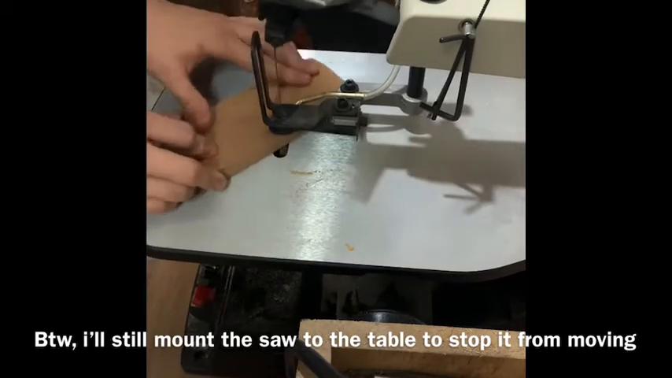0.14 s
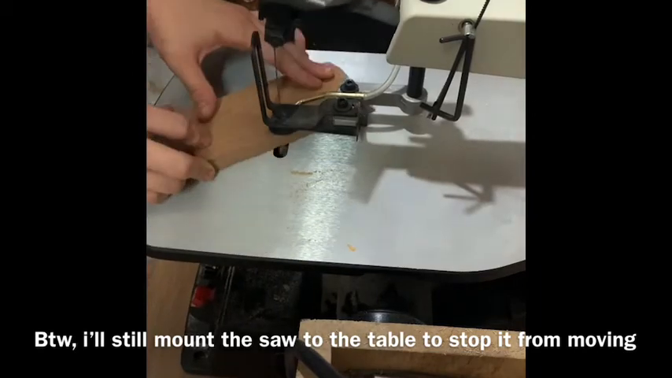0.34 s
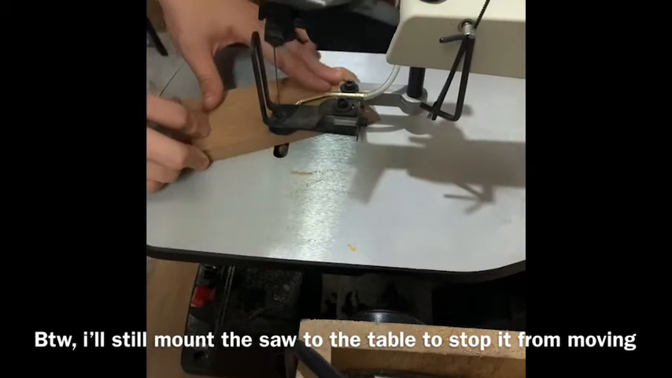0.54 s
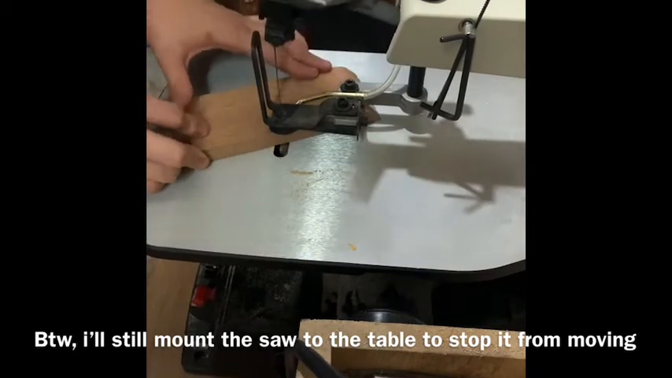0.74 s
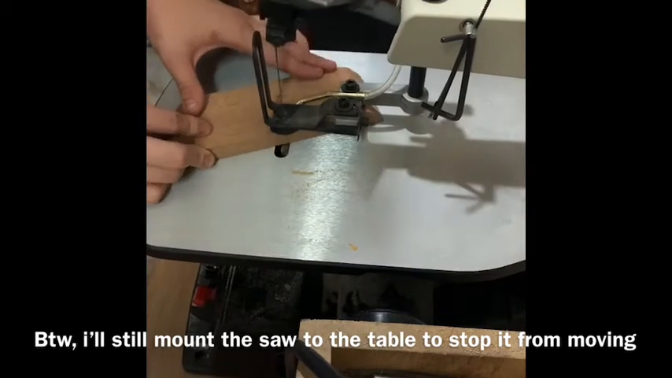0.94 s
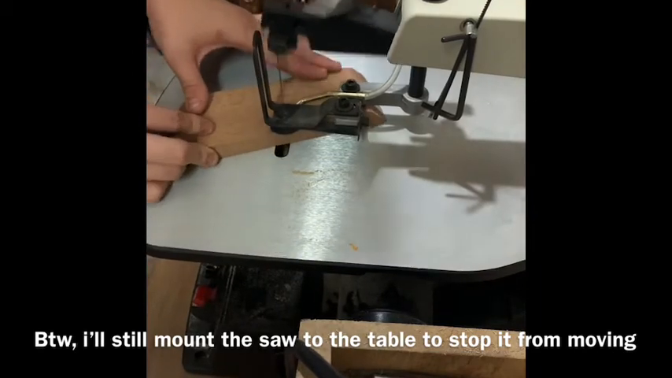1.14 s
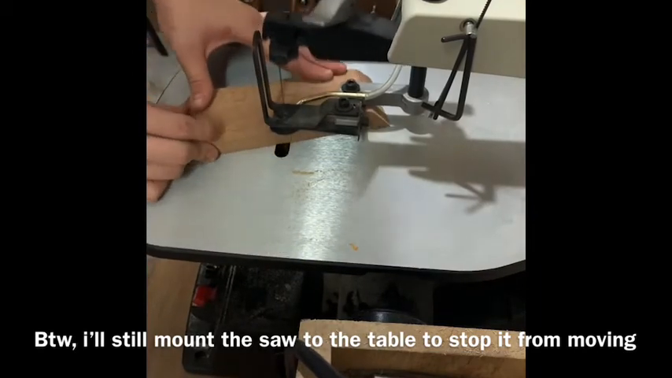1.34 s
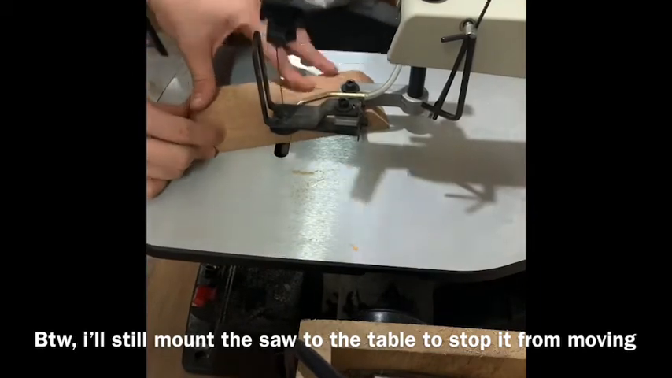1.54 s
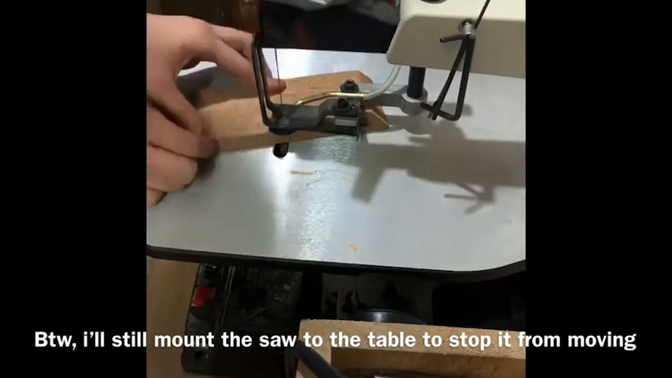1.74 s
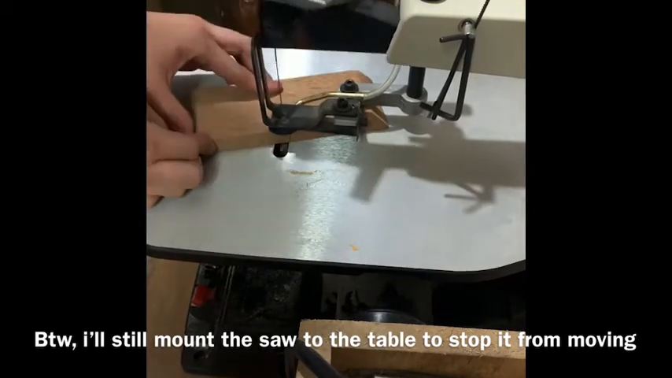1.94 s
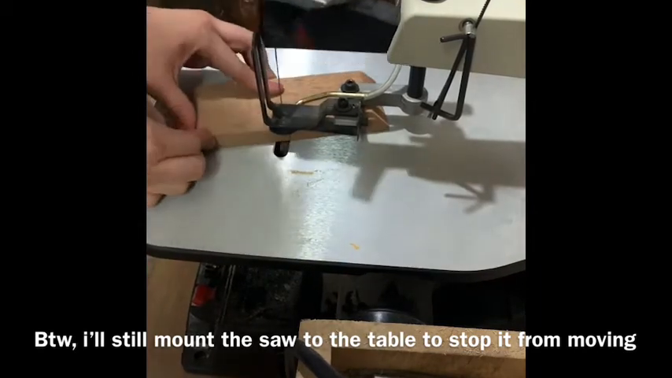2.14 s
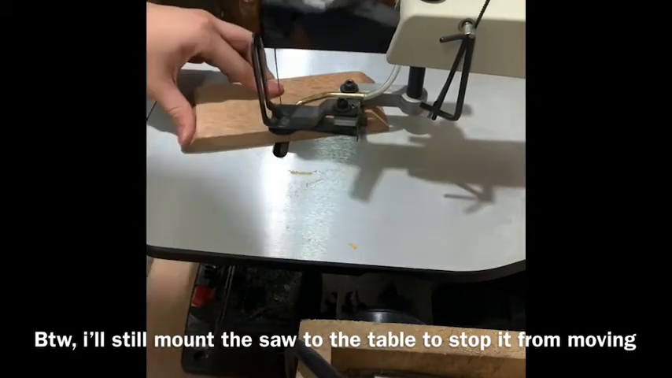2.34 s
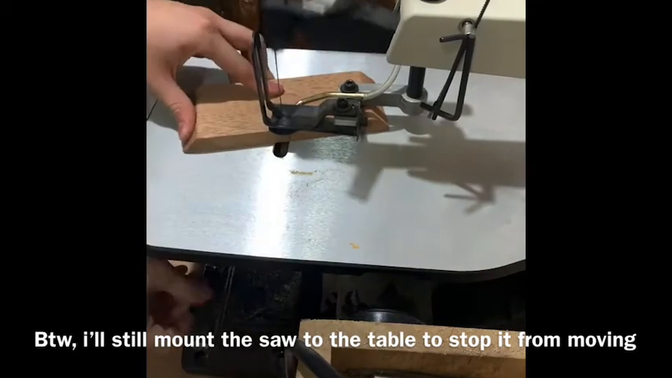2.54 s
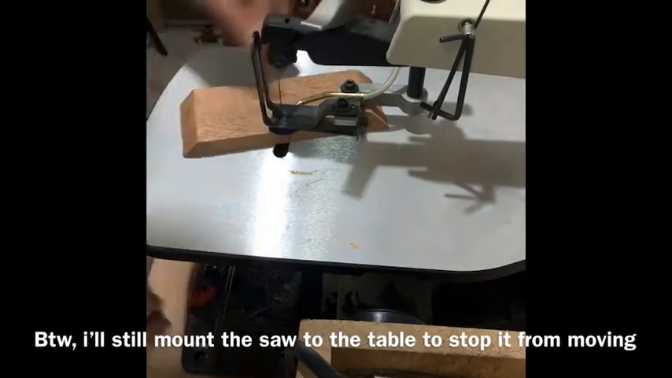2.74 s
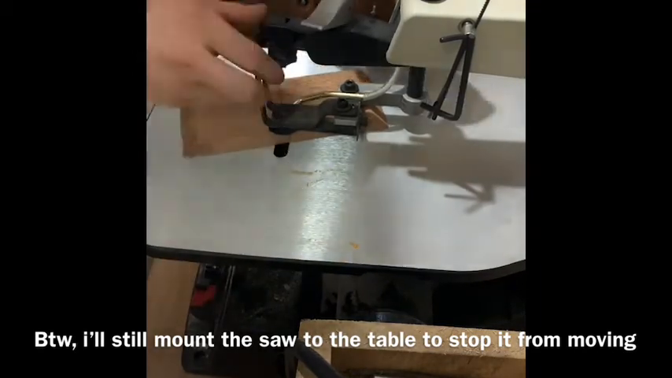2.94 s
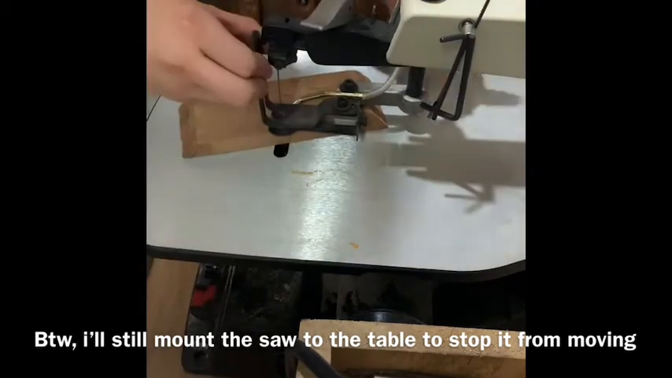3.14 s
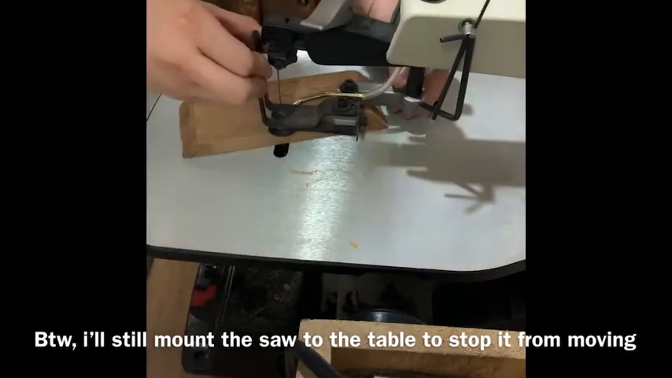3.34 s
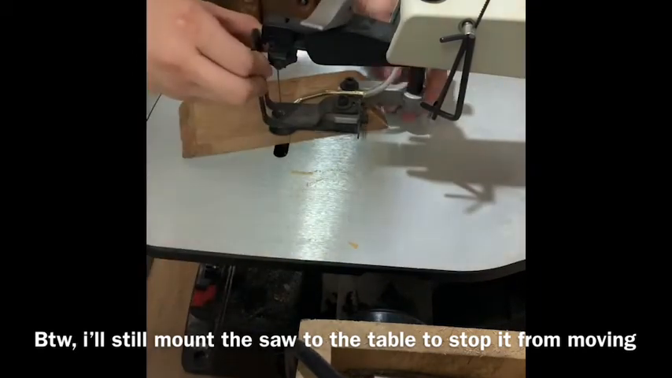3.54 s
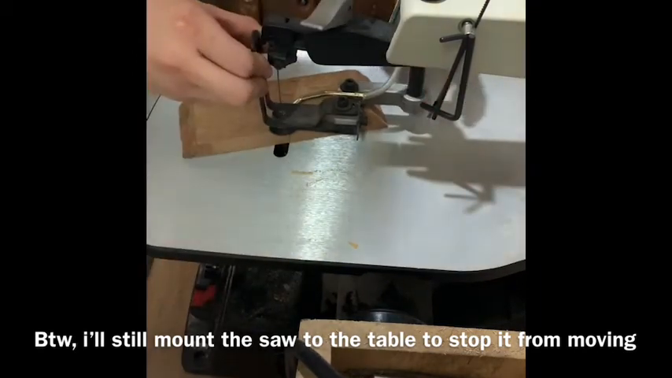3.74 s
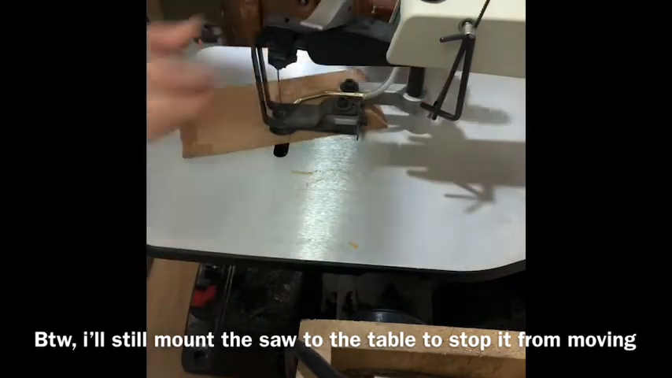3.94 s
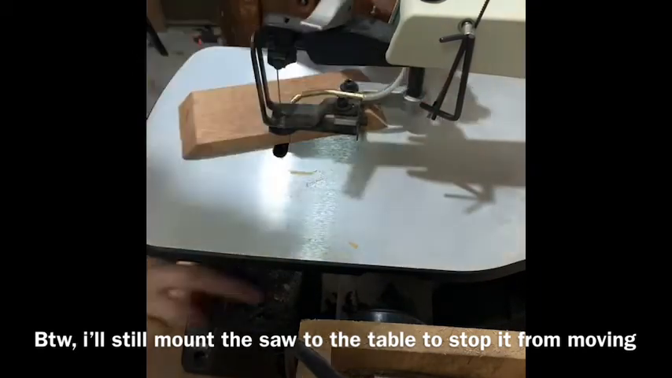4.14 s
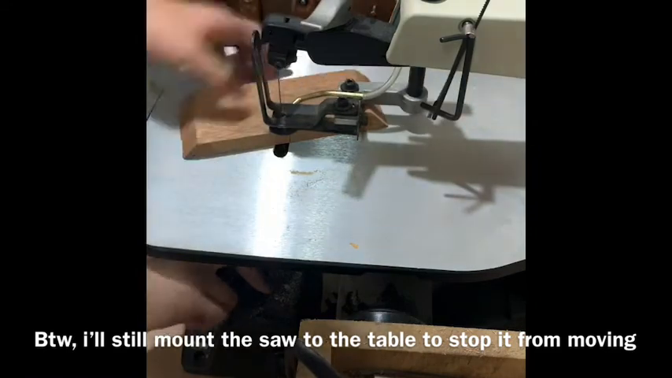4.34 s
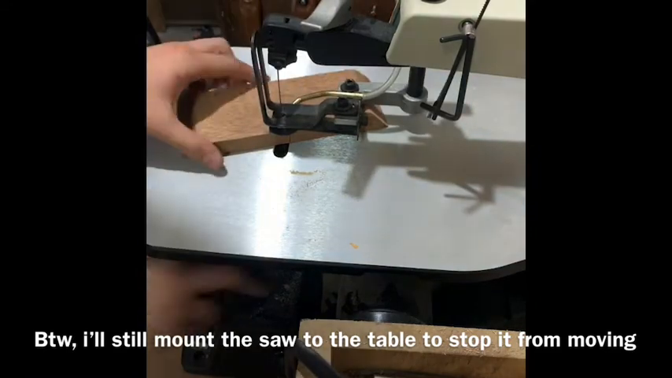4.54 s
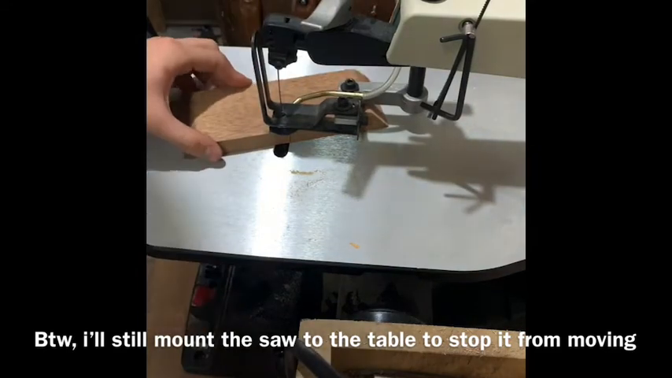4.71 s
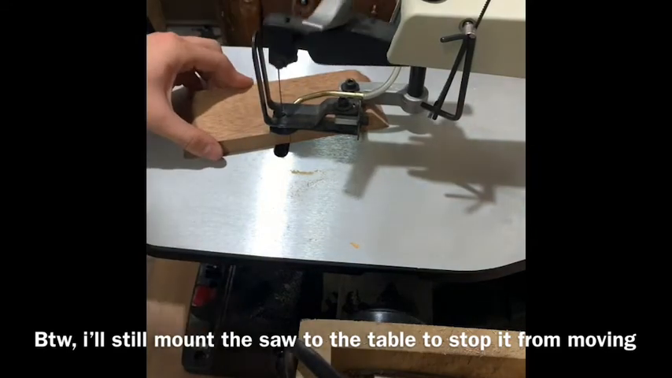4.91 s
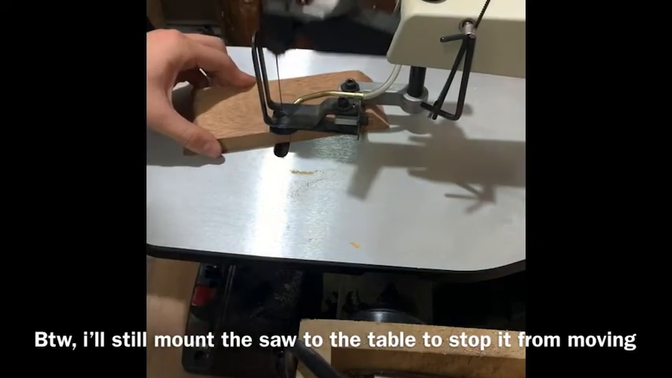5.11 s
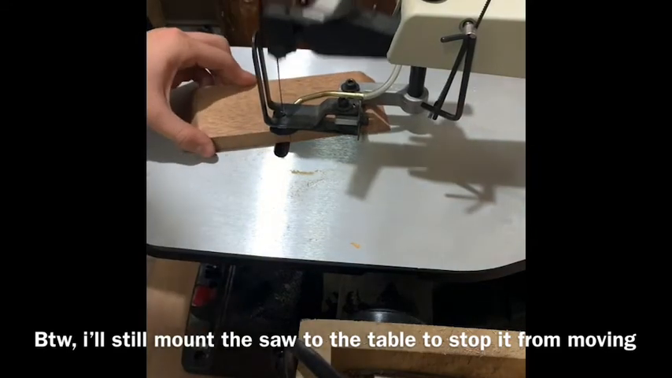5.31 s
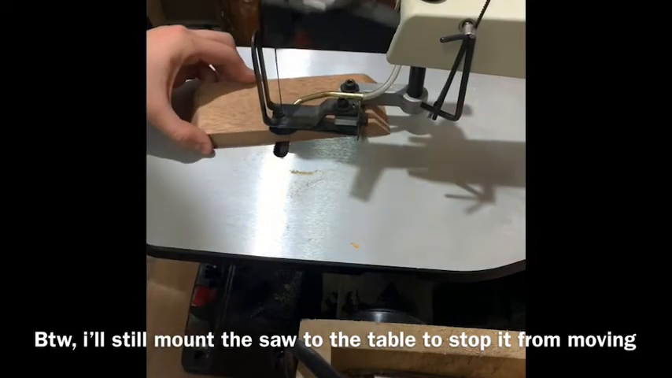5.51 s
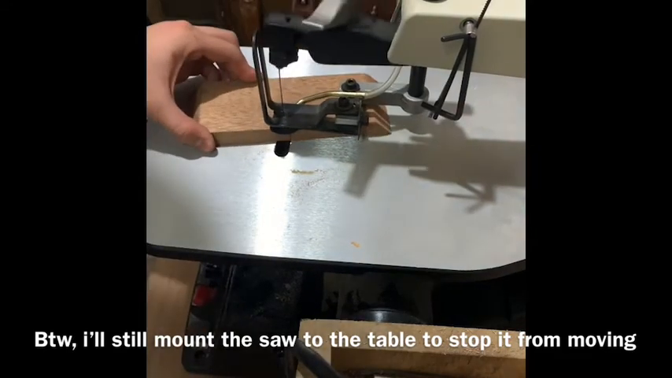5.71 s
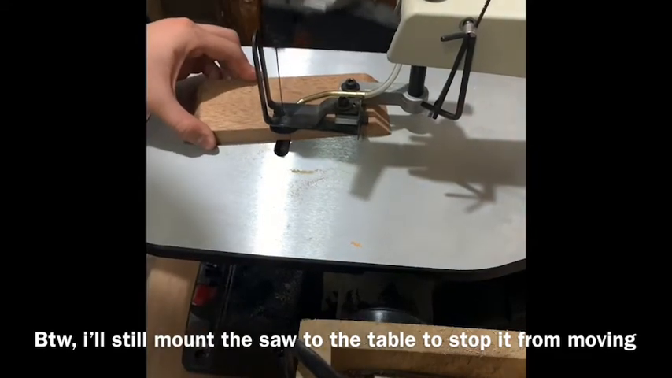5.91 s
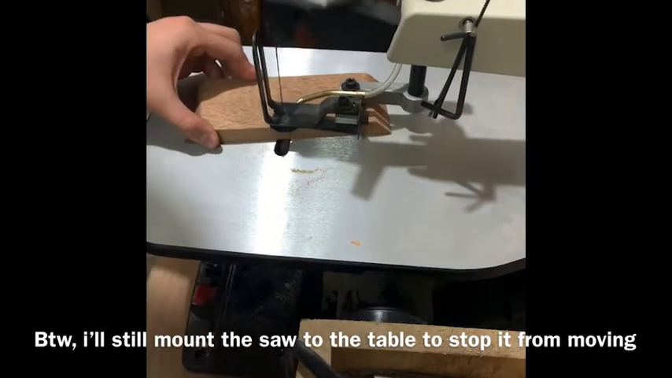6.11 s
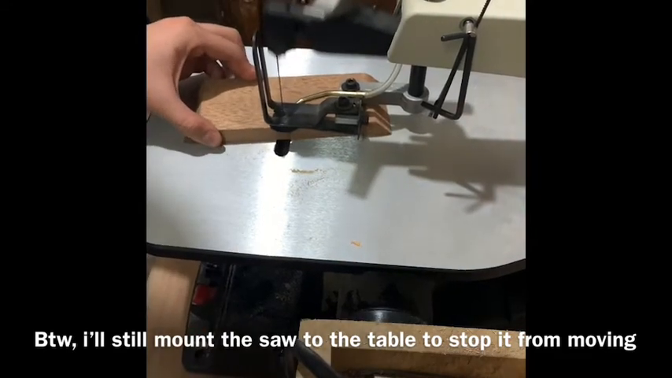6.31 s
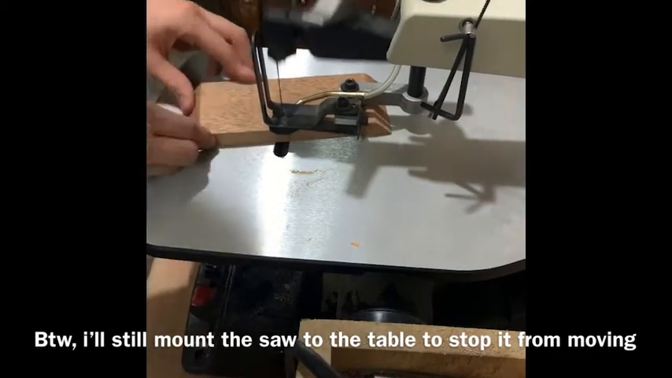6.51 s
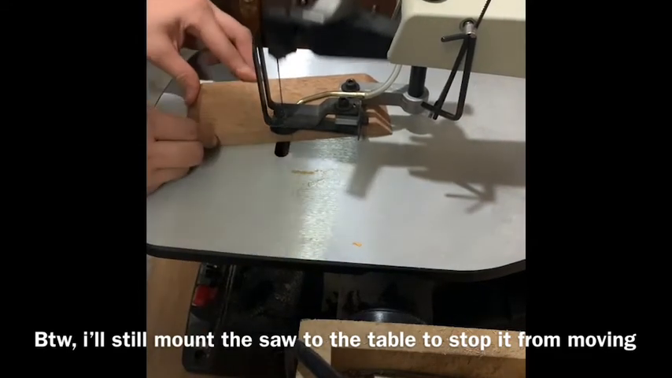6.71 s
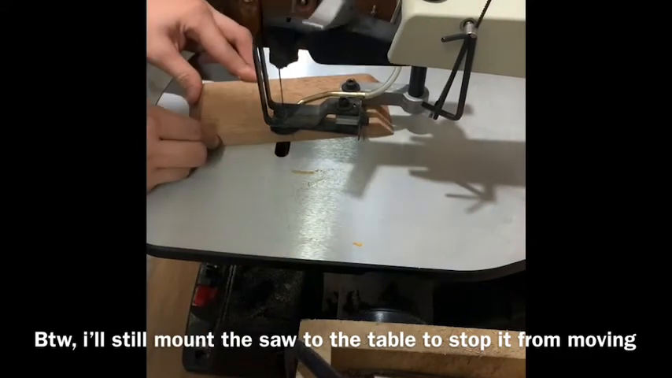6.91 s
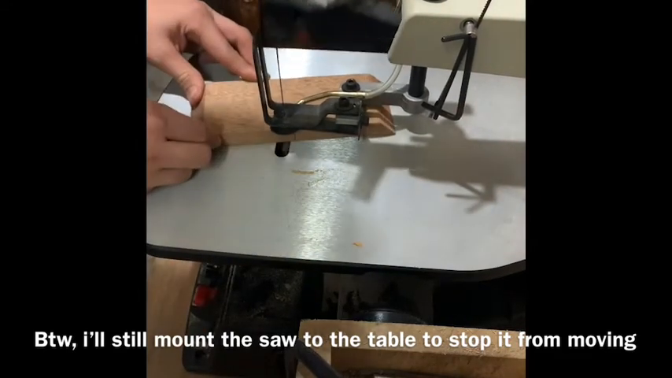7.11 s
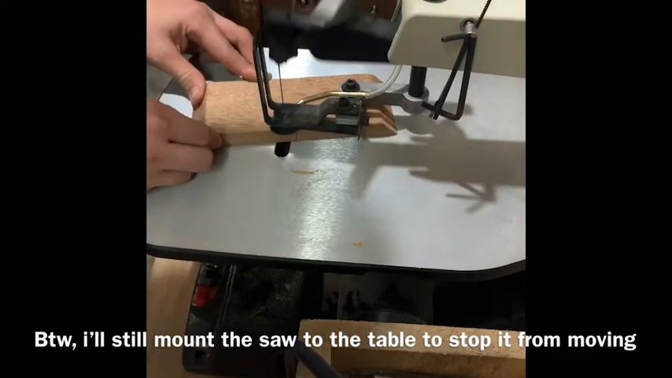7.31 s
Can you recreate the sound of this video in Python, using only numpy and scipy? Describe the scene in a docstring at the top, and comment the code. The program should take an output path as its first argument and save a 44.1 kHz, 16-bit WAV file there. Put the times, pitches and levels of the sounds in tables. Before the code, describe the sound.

A small scroll saw buzzes and rasps through wood, clacks off to a quiet pause, then clacks on and cuts again with brief scraping shrieks.

```python
"""A scroll saw is already cutting a board in a small workshop; it is switched off, and starts again.
Its motor buzzes on rectified mains, swung by the crank about 14 times a second. On every stroke the teeth
rasp through the wood, rattle the board and make the table boom; a heavier feed and a slower crank bring
more rattle, and twisting the board favours the blade's high tone. For a few strokes the blade binds and
shrieks. Two close microphone ports hear it all, with short echoes around."""
import sys
import numpy as np
from scipy import signal
from scipy.fft import rfft, irfft, next_fast_len
from scipy.io import wavfile
from scipy.ndimage import uniform_filter1d

SR = 44100
rng = np.random.default_rng(int(sys.argv[2]) if len(sys.argv) > 2 else 0)


def wrap_up_sound(samples):
    """Save the sound to the file named by the first command line argument, as 16-bit audio."""
    columns = np.atleast_2d(samples).T
    # keep every value between -1 and 1, then stretch to whole-number steps
    tamed = np.clip(columns, -1, 1)
    steps = np.round(tamed * 32767).astype(np.int16)
    wavfile.write(sys.argv[1], SR, steps)


N = 324576

# Resonances of the saw's arm. Each row: pitch in Hz, width in Hz, relative level in dB.
ARM_MODES = [(3175, 120, 1.5), (3455, 140, -2.5), (3610, 82, -0.5), (4200, 53, -9), (4507, 80, 8.5),
             (5034, 76, 4), (5380, 96, -3.5), (5760, 31, 3), (6280, 120, -4.5), (7100, 19, -3),
             (8350, 130, 4)]
# Thin ringing of the steel blade. Each row: pitch in Hz, width in Hz, relative level in dB.
STEEL_MODES = [(4550, 180, 11), (8400, 120, 7), (11300, 92, -5), (12500, 100, 2), (13500, 120, 3),
               (14560, 130, 8.5), (15000, 130, -3)]
# Hiss of the dust, also used for light ticks and faint room hiss. Each row: Hz, relative level in dB.
DUST_SPECTRUM = [(4000, -9.5), (8000, 4), (9600, 1), (11500, 0.5), (13000, -4), (14800, -5), (16000, -11)]
# Bright scrape of the binding blade and snap of the switch. Each row: Hz, relative level in dB.
SHRIEK_SPECTRUM = [(700, -15), (2000, -3), (3200, 0.5), (4400, -0.5), (6000, -3), (8500, 1.5), (9600, 5),
                   (12500, -1), (14700, 3), (16000, -17)]
POWER_OFF_S, POWER_ON_S = 2.605, 4.733
RIPPLE_HZ = 120.05  # ripple of the rectified mains


def from_db(db):
    """Level in dB to an amplitude factor."""
    return 10 ** (np.asarray(db) / 20)


def rms_one(x):
    """Scale to an rms of 1."""
    return x / np.sqrt(np.mean(x ** 2) + 1e-20)


def seconds():
    """Time of every sample."""
    return np.arange(N) / SR


def in_time(rows):
    """The columns of a curve, read at every sample."""
    s, *columns = np.transpose(rows)
    return [np.interp(seconds(), s, c) for c in columns]


def at_hz(points, hz):
    """A curve over frequency, read along a logarithmic axis."""
    known_hz, values = np.transpose(points)
    return np.interp(np.log(hz + 1), np.log(known_hz), values)


def drift(rate):
    """Slow chance with spread 1: noise through two equal low-pass poles at rate (Hz)."""
    step = 40  # samples between drawn points
    r = np.exp(-2 * step * np.pi * rate / SR)
    noise = rng.standard_normal(N // step + 2002)
    slow = signal.lfilter([1], [1, -2 * r, r * r], noise)[2000:]  # drop the filter's settling
    return np.interp(np.arange(N) / step, np.arange(len(slow)), rms_one(slow))


def coloured(x, spectrum):
    """Give a steady signal a spectrum; rms 1."""
    size = next_fast_len(N)
    gain = from_db(at_hz(spectrum, np.fft.rfftfreq(size, 1 / SR)))
    return rms_one(irfft(rfft(x, size) * gain, size)[:N])


def resonate(x, modes, flicker_db=0):
    """Parallel resonances of alternating sign, whose drives may wander; white noise keeps its level."""
    out, power = 0, 0
    for k, (hz, width, db) in enumerate(modes):
        r = np.exp(-np.pi * width / SR)
        drive = x * from_db(flicker_db * np.minimum(drift(38.0), 1.5)) if flicker_db else x
        poles = [1, -2 * r * np.cos(2 * np.pi * hz / SR), r * r]
        ring = signal.lfilter([1, 0, -1], poles, drive + 1e-18)
        out = out + (-1) ** k * from_db(db) * (1 - r * r) / 2 * ring
        power += from_db(2 * db) * (1 - r)
    return out / np.sqrt(power)


def bending(x, modes, bend, flicker_db):
    """Resonances whose pitches all move by the share bend; white noise keeps its level."""
    clock, out, power = np.cumsum(1 + bend) / SR, 0, 0
    for hz, width, db in modes:
        r, spin = np.exp(-np.pi * width / SR), np.exp(2j * np.pi * hz * clock)
        drive = x * from_db(db + flicker_db * np.minimum(drift(20), 1.5))
        # shift the mode down to 0 Hz, smooth it there, and shift it back up
        ring = signal.lfilter([1 - r], [1, -r], drive * spin.conj() + 1e-18)
        out = out + 2 * np.real(spin * ring)
        power += from_db(2 * db) * (1 - r)
    return out / np.sqrt(power)


def grains(per_s, spread_db):
    """Random clicks of uneven size; rms 1."""
    sizes = from_db(spread_db * np.clip(rng.standard_normal(N), -2, 2)) * rng.choice([-1, 1], N)
    return rms_one(sizes * (rng.random(N) < per_s / SR))


def evened(x, span_s):
    """Hold the level of a vibration steady."""
    return x / np.sqrt(uniform_filter1d(x * x, max(int(span_s * SR), 2)) + 1e-9)


def bursts(rows, rise_s, fall_s):
    """Envelope of events (s, dB, length s) that rise, hold and die."""
    out = np.zeros(N)
    for s, db, length in rows:
        start = int(s * SR)
        age = seconds()[:min(N - start, SR // 2)]
        shape = (1 - np.exp(-age / rise_s)) * np.exp(-np.maximum(age - length, 0) / fall_s)
        out[start:start + len(age)] += from_db(db) * shape
    return out


def workshop():
    """Steady background: a dull rush, a low wavering hum and faint hiss."""
    # Colour of the rush. Each row: Hz, relative level in dB.
    rush_spectrum = [(15, -79), (25, -83), (74, -15), (109, -18), (146, -8.5), (260, -13), (339, -2.5),
                     (382, -12.5), (605, -11), (1030, -14.5), (1250, -13), (1360, -25.5), (1500, -17.5),
                     (2000, -19), (2500, -22.5), (4820, -32), (8000, -37), (10400, -70), (17600, -120)]
    rush = from_db(-37.5) * coloured(rng.standard_normal(N), rush_spectrum)
    hum_hz, hum_wander_rad = 145.8, 1.34
    hum = np.sqrt(2) * np.sin(2 * np.pi * hum_hz * seconds() + hum_wander_rad * drift(5.9))
    hiss = from_db(-52.5) * coloured(rng.standard_normal(N), DUST_SPECTRUM)
    return rush + hum * from_db(-49.5 + 2.0 * drift(6.2)) + hiss


def touches():
    """Light ticks of wood chips and fingers on metal, and soft nudges that ring the frame."""
    # Each row: time in seconds, level in dB before the trim below.
    tick_times = [(1.646, -21), (2.9567, -21.5), (3.03, -35), (3.9744, -28.5), (4.156, -19.5)]
    # A hand nudges the frame. Each row: start in seconds, level in dB, length in seconds.
    nudges = [(2.66, -33, 0.033), (2.95, -39, 0.019), (3.13, -37.5, 0.051), (3.38, -32, 0.093),
              (3.49, -35.5, 0.07)]
    taps = bursts([(s, db - 12.5, 0) for s, db in tick_times], rise_s=.0003, fall_s=0.014)
    ticks = coloured(rng.standard_normal(N), DUST_SPECTRUM) * taps
    push = bursts(nudges, rise_s=0.0021, fall_s=0.012)
    frame_modes = [(334, 20, 10.5), (864, 49, -3.0), (2830, 900, -23)]  # Hz, width Hz, relative dB
    frame = evened(resonate(grains(1500, spread_db=1.0), frame_modes), span_s=0.027)
    return ticks + frame * push


def power_switch():
    """The switch snaps and seats: blows ring the housing, its spring sings, and noise snaps (apart)."""
    # Each row: time in seconds, snap in dB, blow on the housing in dB, spring pitch in Hz, its ring in dB.
    contacts = [(2.5805, -11, -10, 2370, -21), (2.5818, -20, 10.5, 2780, -15), (2.5845, -31, 2, 2440, -23),
                (2.597, -40, 3.5, 2300, -33), (4.396, -21, -14, 4270, -18), (4.3988, -22, 7, 3450, -24),
                (4.404, -37, -5, 2980, -24), (4.408, -44, -18, 4150, -41), (4.4155, -31, 2, 3560, -31)]
    # Resonances of the housing. Each row: pitch in Hz, width in Hz, relative level in dB.
    housing_modes = [(568, 22, 0.5), (757, 31, 9.5), (855, 49, 6), (1043, 47, 5), (1223, 28, 12),
                     (1400, 380, -7), (2330, 110, -10), (3020, 140, -11), (3520, 91, -15), (3970, 170, -9)]
    spring_fall_s = 0.0039
    snap_shape = bursts([(s, db, 0) for s, db, *_ in contacts], rise_s=0.00059, fall_s=0.0033)
    snaps = coloured(rng.standard_normal(N), SHRIEK_SPECTRUM) * snap_shape
    blows, spring, age = np.zeros(N), np.zeros(N), seconds()[:SR // 20]
    for s, _, blow_db, hz, ring_db in contacts:
        start = int(s * SR)
        blows[start] = from_db(blow_db)
        ring = np.sin(2 * np.pi * hz * age) * np.exp(-age / spring_fall_s)
        spring[start:start + len(age)] += from_db(ring_db) * ring
    return resonate(blows, housing_modes) + spring, snaps


def binding():
    """At the top of each tight stroke the blade catches, jams with a slap, then scrapes and rings."""
    # Each row: slap time in seconds, slap in dB, scrape in dB, scrape length in seconds.
    jams = [(5.717, -30, -33, 0.015), (5.793, -18, -29.5, 0.021), (5.864, -26, -25, .02),
            (5.935, -34, -26, 0.02), (6.012, -20, -28.5, 0.02), (6.08, -24, -22.5, 0.014),
            (6.151, -31, -22.5, 0.018), (6.225, -18, -21, 0.017), (6.3, -22.5, -36, .005),
            (6.433, -27, -36, 0.0064)]
    catch_lead_s, catch_s, catch_db = 0.0143, 0.0017, -1  # dB relative to the scrape
    slap = bursts([(s, db, 0) for s, db, _, _ in jams], rise_s=.0002, fall_s=0.0032)
    scrape = bursts([(s, db, length) for s, _, db, length in jams], rise_s=0.00077, fall_s=0.0042)
    catches = [(s - catch_lead_s, db + catch_db, catch_s) for s, _, db, _ in jams]
    catch = bursts(catches, rise_s=.001, fall_s=0.0017)
    steel = resonate(grains(4400, spread_db=-3.5), STEEL_MODES, flicker_db=-1.5)
    shriek = coloured(grains(3500, spread_db=4), SHRIEK_SPECTRUM)
    arm = resonate(grains(3000, spread_db=6), ARM_MODES, flicker_db=0.0)
    return (slap + scrape) * (shriek + 0.5 * steel + 0.27 * arm) + catch * steel


def grabs():
    """The teeth grab the wood, which knocks or squawks: short rough tones, each gliding from its pitch."""
    # Each row: start in seconds, level in dB, length in seconds, pitch in Hz,
    # glide in shares of the pitch per second.
    squawks = [(1.057, -25, 0.018, 1570, -1), (1.127, -12.5, 0.019, 934, -1),
               (1.229, -12, 0.0086, 900, 3.5), (1.305, -20, 0.015, 856, -2.5),
               (4.968, -28, 0.019, 1210, 10.5), (5.062, -30, 0.031, 1270, 8.5),
               (5.134, -31, 0.023, 1460, 4), (5.213, -31, 0.023, 1430, 5), (5.367, -22, 0.02, 1445, 3.5),
               (5.938, -16, 0.0091, 924, 8), (6.159, -15, 0.0088, 920, 3), (6.367, -15.5, 0.019, 852, 1),
               (6.861, -15, 0.015, 877, -0.5), (6.913, -15.5, 0.014, 861, 1), (7.067, -27, 0.016, 870, -8)]
    rough_rad = 0.52 * drift(86)
    out, age = np.zeros(N), seconds()[:SR // 8]
    for s, db, length, hz, glide in squawks:
        span = slice(int(s * SR), int(s * SR) + len(age))
        shape = (1 - np.exp(-age / 0.0091)) * np.exp(-np.maximum(age - length, 0) / 0.011)
        cycles = hz * age * (1 + glide * np.minimum(age, length) / 2)
        out[span] += from_db(db) * shape * np.sin(2 * np.pi * cycles + rough_rad[span])
    return out


def bites():
    """The teeth bite hard: snapping fibres ring each at its own pitch, a broad crunch or narrow squeal."""
    # Each row: start in seconds, level in dB, length in seconds, pitch in Hz, width in Hz.
    crunches = [(1.048, -28.5, 0.021, 2400, 700), (1.13, -34, 0.032, 2620, 500),
                (1.173, -32, 0.017, 2440, 200), (1.278, -33, 0.019, 2230, 500),
                (1.352, -35, .024, 4440, 500), (1.498, -36, .018, 3210, 700), (1.64, -29, 0.011, 4440, 900),
                (1.77, -31, .014, 4000, 1200), (1.907, -33, 0.014, 4500, 900),
                (2.116, -35, .016, 4400, 900), (2.25, -32, 0.013, 3400, 900),
                (2.388, -31, 0.019, 3200, 900), (6.426, -40, .016, 3330, 250),
                (6.488, -29.5, 0.017, 3370, 200), (6.533, -32, 0.012, 3240, 160),
                (6.572, -30, 0.015, 3480, 160), (6.831, -31, 0.017, 2730, 700),
                (6.91, -33, 0.016, 3100, 700), (6.994, -27, 0.016, 3400, 1800),
                (7.302, -31, 0.019, 3400, 1500)]
    out, grit, age = np.zeros(N), grains(2500, spread_db=5.5), seconds()[:SR // 20]
    for s, db, length, hz, width in crunches:
        span = slice(int(s * SR), int(s * SR) + len(age))
        shape = (1 - np.exp(-age / 0.0028)) * np.exp(-np.maximum(age - length, 0) / 0.0027)
        out[span] += from_db(db) * shape * rms_one(resonate(grit[span], [(hz, width, 0)]))
    return out


def crank():
    """Turns so far, and drag (strokes/s lost to the cut); it coasts to rest and spins up with the power."""
    # Speed once up and running, sagging under the cut. Each row: time in seconds, strokes per second.
    running_speed = [(0.0, 14.89), (0.4, 14.85), (0.7, 15.15), (1.0, 14.17), (1.2, 12.62), (1.45, 13.9),
                     (1.75, 15.39), (2.1, 14.51), (2.58, 14.25), (5.2, 13.2), (5.7, 13.03), (6.2, 14.31),
                     (6.5, 15.0), (6.7, 15.54), (6.9, 12.27), (7.36, 13.53)]
    free_strokes_per_s, spin_down_s, spin_up_s, start_turns = 15, .0387, .1223, .4
    t = seconds()
    speed, = in_time(running_speed)
    coasting = np.exp(-np.maximum(t - POWER_OFF_S, 0) / spin_down_s)
    restarting = 1 - np.exp(-np.maximum(t - POWER_ON_S, 0) / spin_up_s)
    turns = np.cumsum(speed * (coasting + restarting)) / SR + start_turns
    return turns, free_strokes_per_s - speed


def pressed_flat():
    """1 while the board is pressed flat on the table, else 0, with short ramps between."""
    # From and to, in seconds.
    press_span = (1.47, 2.65)
    start, end = press_span
    ramp_s = 0.13
    return np.clip(np.minimum(seconds() - start, end - seconds()) / ramp_s + .5, 0, 1)


def ripple_cycles(multiple):
    """Cycles of one harmonic of the current ripple; the frame delays each differently."""
    k = round(multiple)
    return k * RIPPLE_HZ * seconds() + (k / np.e) ** 2


def motor(turns, feed_db):
    """Current ripple shakes the frame; the crank's changing leverage splits each harmonic into three lines."""
    # Each row: multiple of the ripple, dB one stroke rate below it, dB on it, dB one stroke rate above it,
    # share of the cycle at which it is loudest; all levels before the load and trim below.
    ripple_lines = [(2, -44, -48.5, -44, 0.47), (3, -25.5, -36.5, -38, 0.89), (4, -65, -42.5, -49, 0.28),
                    (5, -73, -51.5, -45, 0.25), (6, -67, -52, -52, 0.52), (7, -33.5, -54, -38.5, 0.11),
                    (8, -42, -66, -55, 0.4), (9, -38, -37.5, -34, 0.52), (10, -39, -41.5, -40.5, 0.58),
                    (15, -52.5, -50.5, -77, 1), (16, -54, -54, -75, 1)]
    light_feed_db, swell, waver = -5.5, 0.74, 0.45
    load_db = swell * np.maximum(feed_db - light_feed_db, 0)
    lever = np.exp(2j * np.pi * turns)
    buzz = 0
    for multiple, below_db, centre_db, above_db, loudest in ripple_lines:
        swing = lever * np.exp(-2j * np.pi * loudest)
        lines = from_db(below_db) / swing + from_db(centre_db) + from_db(above_db) * swing
        # high harmonics waver most; low ones swell with the load
        chance = drift(8.3) + 1j * drift(26)
        unsteady = (1 + waver * min(multiple / 10, 1) ** 2 * chance) * from_db(load_db / multiple)
        buzz = buzz + np.real(lines * unsteady * np.exp(2j * np.pi * ripple_cycles(multiple)))
    # the board drones along more strongly while pressed flat
    drone = np.sqrt(2) * np.sin(2 * np.pi * (ripple_cycles(2) - turns))
    drone = drone * from_db(-52.5 + 14.5 * pressed_flat())
    # the starting current makes the buzz surge, then it settles
    inrush_db, inrush_s = 3, 0.34
    since_on = seconds() - POWER_ON_S
    surge = from_db(inrush_db * (since_on > 0) * np.exp(-np.abs(since_on) / inrush_s))
    return surge * (buzz * from_db(-0.38) + drone)


def table_boom(turns, heave_db):
    """The table's main mode: one firm tone, kept ringing by the strokes and heaving with them."""
    # Each row: time in seconds, boom in dB before the trim and swings below.
    boom_level = [(0, -34), (.55, -40), (.9, -34), (1.13, -51), (1.25, -21), (1.38, -16.5), (1.7, -25),
                  (1.98, -23), (2.08, -17.5), (2.58, -23), (4.75, -44), (5.35, -23), (5.65, -15.5),
                  (5.8, -25), (5.92, -13.5), (6.1, -28), (6.4, -21.5), (6.7, -22.5), (6.95, -16.5),
                  (7.36, -21.5)]
    level_db, = in_time(boom_level)
    peak_share, swing_db, flicker_db, wander_rad = 0.813, 4.5, 2, 1
    stroke = turns - peak_share
    cycles = ripple_cycles(3) - 2 * stroke  # two stroke rates under the ripple's third harmonic
    tone = np.sqrt(2) * np.sin(2 * np.pi * cycles + wander_rad * drift(4.6))
    swing = swing_db * np.cos(2 * np.pi * stroke) + 0.42 * heave_db
    return tone * from_db(level_db - 5 + swing + flicker_db * drift(3.8))


def table_rumble(feed_db, heave_db):
    """Random knocks ring the table, louder with the feed and damped by a board pressed flat."""
    # Each row: pitch in Hz, width in Hz, relative level in dB.
    table_modes = [(139, 7.9, -19), (206, 17, -20.5), (225, 8.5, -15), (266, 17, -8.5), (312.3, 15, 2),
                   (340, 18.5, -2.5), (368.7, 24, -4.5), (447.5, 52, -13), (479.6, 41, -15.5)]
    rumble = evened(resonate(grains(1500, spread_db=3.0), table_modes), span_s=0.03)
    return rumble * from_db(-29.5 + feed_db + heave_db - 2.5 * pressed_flat())


def board_rattle(drag, feed_db, knock_db, bend):
    """The strokes shake the loose board, more so when the crank is dragged down."""
    # Each row: pitch in Hz, width in Hz, relative level in dB.
    board_modes = [(627, 47, -12.5), (732, 16, -17), (806, 7, -2.5), (859, 52, 4.5), (895, 14, 4.5),
                   (938, 8.5, 4), (1030, 17, -9), (1115, 10, -3), (1210, 42, -23), (1220, 120, -24)]
    knocks = grains(900, spread_db=2.5) * from_db(knock_db)
    rattle = bending(knocks, board_modes, bend / 2, flicker_db=2.5)
    return rattle * from_db(-35.5 + 2 * drag + 0.4 * feed_db)


def teeth(turns, jitter):
    """A click for every tooth, coming faster at mid-stroke and stopping at the turns; rms 1."""
    tooth_hz = 523.3  # teeth per second at the fastest moment, before jitter
    speed = np.abs(np.gradient(np.cos(2 * np.pi * (turns + .05))))
    passed = np.cumsum(tooth_hz / SR * speed / speed.max() * (1 + jitter * drift(120)))
    sizes = from_db(4.4 * np.clip(rng.standard_normal(N), -2, 2))
    return rms_one(np.diff(np.floor(passed), prepend=0) * sizes)


def blade_tones(strikes, drag, twist_db, depth_db, bite_db, bend):
    """Tooth strikes ring the blade; twisting trades its low tone for its high one."""
    # Low tone. Each row: pitch in Hz, width in Hz, relative level in dB.
    low_modes = [(2077, 55, 13), (2020, 110, 3.5)]
    # High tone. Each row: pitch in Hz, width in Hz, relative level in dB.
    high_modes = [(2980, 104, 11), (3150, 73, 1.7), (3324, 29, 1.7)]
    low_db = -43.5 + 2.5 * drag - 0.5 * twist_db + 0.43 * depth_db
    high_db = -43.5 - 0.5 * drag + 1.22 * twist_db + 0.43 * depth_db
    low = bending(strikes * from_db(low_db + 0.39 * bite_db), low_modes, bend, flicker_db=2.5)
    high = bending(strikes * from_db(high_db + 0.41 * bite_db), high_modes, bend / 2, flicker_db=3)
    return low + high


def wood_tones(strikes, bite_db, bend):
    """The wood's own resonances, which bend as the blade travels through the kerf."""
    # Lower resonances. Each row: pitch in Hz, width in Hz, relative level in dB.
    wood_modes = [(1100, 55, -1), (1330, 40, -13), (1520, 58, 2), (1790, 106, -4)]
    # Resonances at the kerf. Each row: pitch in Hz, width in Hz, relative level in dB.
    kerf_modes = [(2420, 210, 9), (2520, 81, -10)]
    # How strongly the teeth excite the lower ones. Each row: time in seconds, dB before the trim below.
    wood_level = [(0, -40.5), (.75, -42), (.92, -29.5), (1.15, -30), (1.5, -61), (2.58, -37), (4.75, -49),
                  (5.05, -30), (5.4, -32.5), (5.7, -30), (6.3, -30.5), (6.5, -58), (7.36, -49)]
    # How strongly the teeth excite the kerf. Each row: time in seconds, dB before the trim below.
    kerf_level = [(0, -65), (.8, -57), (1.15, -52), (1.4, -32), (1.85, -39), (2.1, -38), (2.58, -38),
                  (4.75, -65), (5.3, -49), (5.7, -59), (7.36, -48)]
    (wood_db,), (kerf_db,) = in_time(wood_level), in_time(kerf_level)
    wood_drive = strikes * from_db(wood_db - 6 + 0.2 * bite_db)
    kerf_drive = strikes * from_db(kerf_db - 5 + 0.091 * bite_db)
    wood = bending(wood_drive, wood_modes, 2 * bend, flicker_db=6.0)
    return wood + bending(kerf_drive, kerf_modes, 2 * bend, flicker_db=5)


def arm_and_rasp(strikes, depth_db, bite_db, bend):
    """The strikes ring the saw's arm, and with the snapping fibres they rasp."""
    # Each row: Hz, relative level in dB.
    rasp_spectrum = [(400, -34), (1000, 3), (1500, 2), (2400, 0), (3500, -0.5), (5000, -4), (7000, -3),
                     (8500, -4.5), (10000, -1.5), (12000, -15.5), (16000, -43)]
    arm_drive = strikes * from_db(-41 + depth_db + 0.51 * bite_db)
    arm = bending(arm_drive, ARM_MODES, 0.82 * bend, flicker_db=5.5)
    rasp = coloured(0.55 * strikes + 0.87 * grains(3000, spread_db=4.0), rasp_spectrum)
    return arm + rasp * from_db(-38.5 + depth_db + 0.48 * bite_db)


def dust_and_steel(strikes, depth_db, twist_db, bite_db):
    """Dust hisses out of the kerf over the thin ring of the steel."""
    # The highest modes sing out as the board is turned. Each row: pitch in Hz, width in Hz, relative dB.
    top_modes = [(12660, 350, 8), (13150, 140, -11), (14200, 160, 0)]
    # Their level. Each row: time in seconds, dB before the swing of the strokes.
    top_level = [(0, -51), (1.55, -68), (1.7, -51), (2.58, -50), (4.75, -87), (6.6, -56), (6.9, -41.5),
                 (7.36, -39.5)]
    hiss = coloured(grains(7700, spread_db=-1.5), DUST_SPECTRUM)
    sizzle = 0.94 * hiss + 0.18 * resonate(strikes, STEEL_MODES, flicker_db=8.5)
    dust = sizzle * from_db(-42 + depth_db + 0.24 * twist_db + bite_db)
    top_db, = in_time(top_level)
    return dust + resonate(strikes, top_modes, flicker_db=2) * from_db(top_db + 0.5 * bite_db)


def saw(turns, drag):
    """Motor, table, board and teeth, all paced by the crank and driven by the hands on the board."""
    # How hard the board is fed, as the force on the table. Each row: time in seconds, dB.
    feed_curve = [(0, -0.5), (0.75, -2.5), (1.2, 4), (1.4, 3), (1.8, -1), (2.15, -0.5), (2.58, 0),
                  (4.75, -14), (5.05, -1), (5.65, -0.5), (6.68, -0.5), (6.9, 4.5), (7.36, 4.5)]
    # How deeply the teeth engage the wood. Each row: time in seconds, dB.
    depth_curve = [(0, -0.5), (0.75, -7), (1.05, -0.5), (1.45, 3), (2.1, 0), (2.58, 1), (4.75, -14.5),
                   (5.0, -2), (5.2, 0.5), (5.6, -0.5), (7.36, 0.0)]
    # Sideways pressure on the blade. Each row: time in seconds, dB toward the high tone.
    twist_curve = [(0, -13.5), (0.75, -7.5), (1.2, -12.5), (1.9, -11.5), (2.55, 4), (4.75, -1.5),
                   (5.3, -13), (5.65, 0.5), (6.1, -2.5), (6.42, 7.5), (7.36, 7)]
    # One stroke, cutting down and then returning. Each row: share of the cycle,
    # table heave, board knock and teeth, each in dB before the contrast below.
    stroke_shape = [(.03, 2, 1.5, 4), (.16, 5, 7, 6.5), (.3, 1.5, 4, -6.5), (.46, 1.5, 1.5, -3),
                    (.58, 0, -1, -0.5), (.73, 3, 0, 0.5), (.84, 5, 0.5, -1.5), (.94, -5, 3, -10)]
    (feed_db,), (depth_db,), (twist_db,) = in_time(feed_curve), in_time(depth_curve), in_time(twist_curve)
    share, *columns = np.transpose(stroke_shape)
    # the harder the board is fed, the more the strokes stand out
    contrast = np.clip(1.63 + 1.13 * feed_db, .3, 1.3)
    heave_db, knock_db, teeth_db = [contrast * np.interp(turns % 1, share, c, period=1) for c in columns]
    bite_db = teeth_db + 0.9 * drift(23)  # the grain of the wood resists unevenly
    bend = 0.018 * np.sin(2 * np.pi * turns) + 0.01 * drift(7.5)  # share of the pitch
    # teeth strike and fibres snap; the contact slides along the blade and favours ever different modes
    strikes = 0.56 * teeth(turns, jitter=.04) + 0.65 * grains(2000, spread_db=-3.0)
    cutting = table_boom(turns, heave_db) + table_rumble(feed_db, heave_db)
    cutting = cutting + board_rattle(drag, feed_db, knock_db, bend)
    cutting = cutting + blade_tones(strikes, drag, twist_db, depth_db, bite_db, bend)
    cutting = cutting + wood_tones(strikes, bite_db, bend)
    cutting = cutting + arm_and_rasp(strikes, depth_db, bite_db, bend)
    cutting = cutting + dust_and_steel(strikes, depth_db, twist_db, bite_db)
    # the switch cuts the drive, and the saw picks up quickly when switched on again
    run_down_db_per_s, pick_up_s = 305, .004
    t = seconds()
    running = from_db(-run_down_db_per_s * np.maximum(t - POWER_OFF_S, 0))
    running = running + np.clip((t - POWER_ON_S) / pick_up_s, 0, 1)
    return running * motor(turns, feed_db), running * cutting


def reflections(x, count):
    """Close echoes off the table, hands and walls, each wandering in strength; together they keep the level."""
    gap_s, room_t60_s = .0016, 0.16
    out, power = np.zeros(N), 0
    for k in range(count):
        lag = int((k + rng.random()) * gap_s * SR) + 1
        gain = from_db(-60 * lag / SR / room_t60_s) * drift(5.14)
        out[lag:] += gain[lag:] * x[:N - lag]
        power = power + gain * gain
    return out / np.sqrt(power)


def microphone(tonal, noisy):
    """Direct sound reaches the two ports out of step; the room scatters the noises differently to each."""
    # Each row: Hz, radians by which the left port leads the right.
    left_lead = [(60, 0), (400, .06), (800, 0), (1000, -.9), (1250, -.7), (2200, 0), (3600, .1),
                 (4500, 1.3), (6600, 1.4), (8500, 2.5), (9200, 3.1), (10100, 3.2), (11200, 4.6), (12500, 6),
                 (16000, 6.6)]
    # Each row: Hz, share of direct sound in the power of the noises.
    direct_share = [(60, 1), (300, 0.99), (600, 0.93), (850, 0.88), (1400, 0.14), (2500, 0.49),
                    (4500, 0.72), (7000, 0.61), (9100, 1), (10200, 0.99), (12000, 0.61), (16000, 1)]
    # Each row: Hz, left minus right in dB.
    left_balance = [(60, -0.45), (380, -1.24), (1300, -2), (2400, 0.51), (4400, -0.77), (8000, -0.1)]
    size = next_fast_len(N + SR // 20)
    hz, sides = np.fft.rfftfreq(size, 1 / SR), np.array([[1], [-1]])  # left, right
    lead = np.exp(.5j * sides * at_hz(left_lead, hz))
    room = rfft(np.array([reflections(noisy, count=6) for _ in sides]), size)
    share = np.clip(at_hz(direct_share, hz), 0, 1)
    direct = (rfft(tonal, size) + np.sqrt(share) * rfft(noisy, size)) * lead
    heard = direct + np.sqrt(1 - share) * room
    return irfft(heard * from_db(sides * at_hz(left_balance, hz) / 2), size)[:, :N]


def scene():
    """The saw and the hands at it, in the workshop."""
    background = workshop() + touches()
    clacks, snaps = power_switch()
    turns, drag = crank()
    buzz, cutting = saw(turns, drag)
    tonal = buzz + clacks + grabs()
    noisy = cutting + bites() + binding() + snaps + background
    return microphone(tonal, noisy)


def record(dry):
    """The top is cut steeply at 15.9 kHz."""
    return signal.sosfilt(signal.ellip(10, .2, 80, 15900, fs=SR, output="sos"), dry)


dry = scene()
out = record(dry)
wrap_up_sound(out)
```